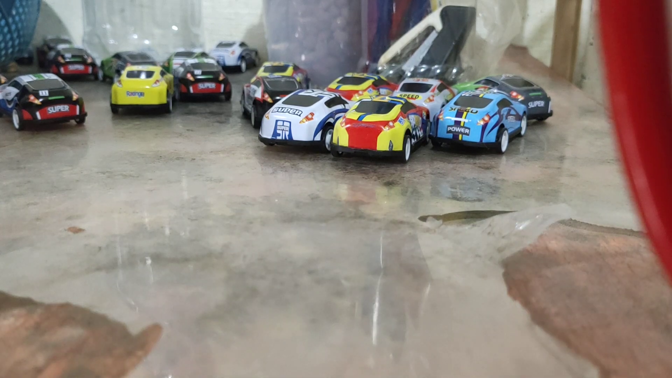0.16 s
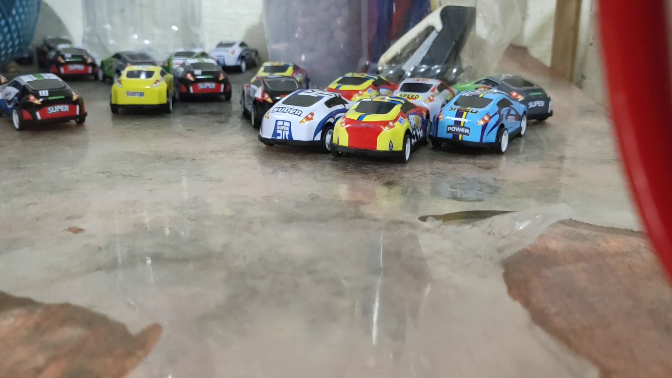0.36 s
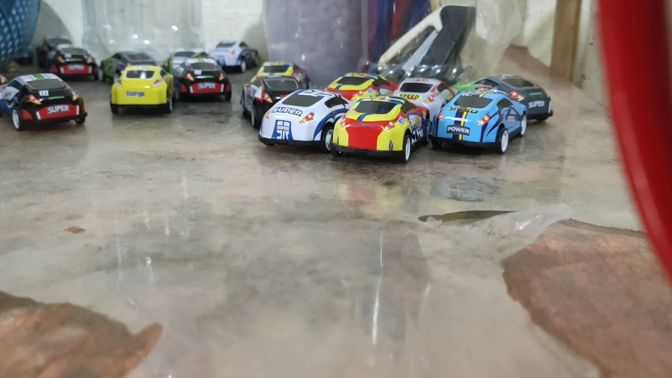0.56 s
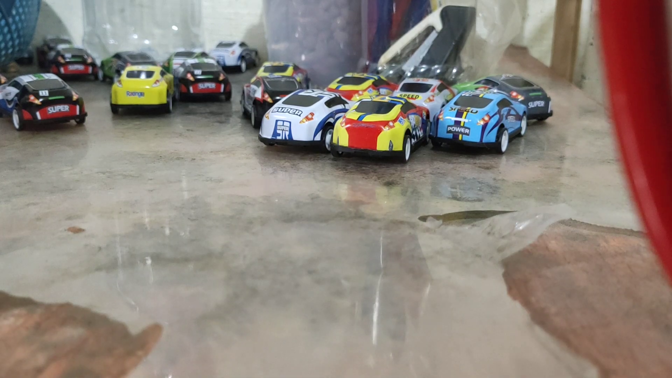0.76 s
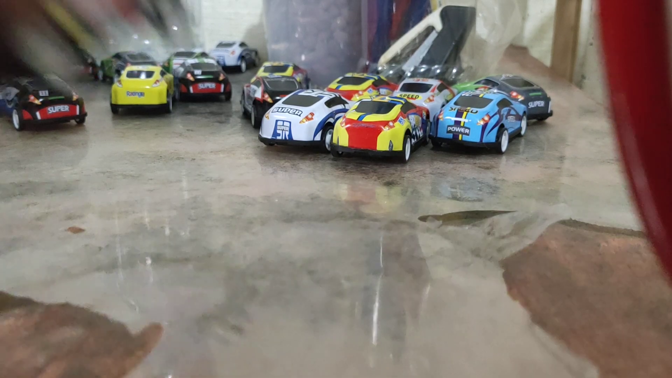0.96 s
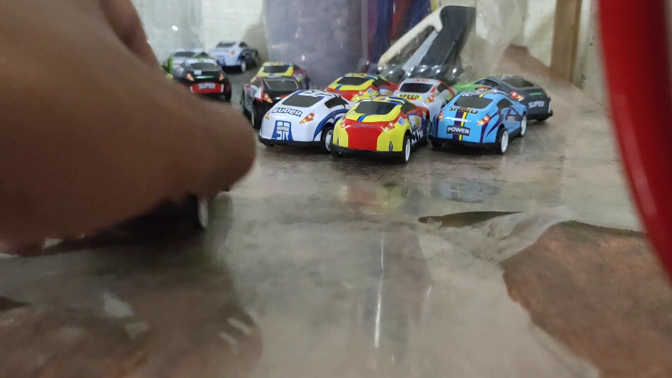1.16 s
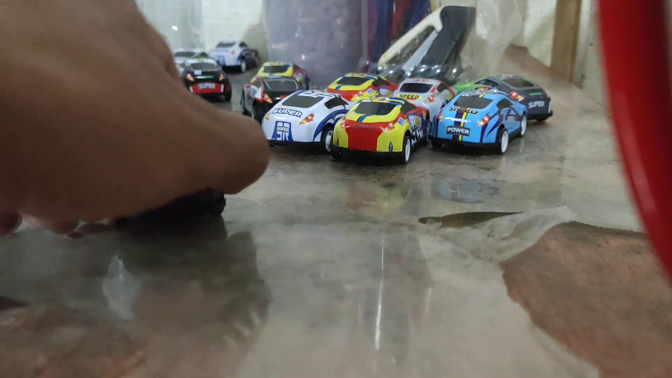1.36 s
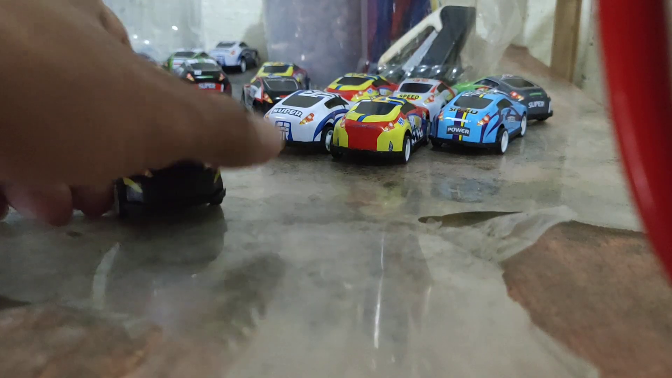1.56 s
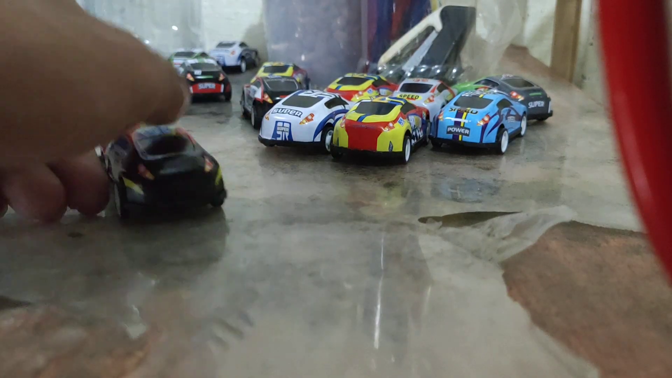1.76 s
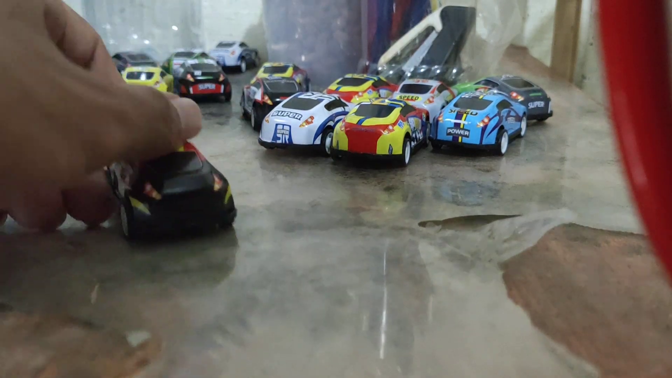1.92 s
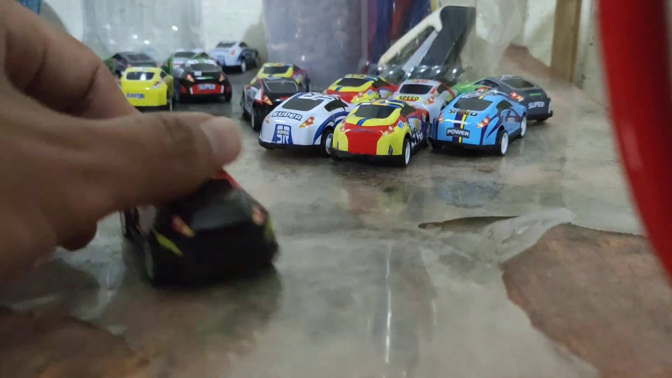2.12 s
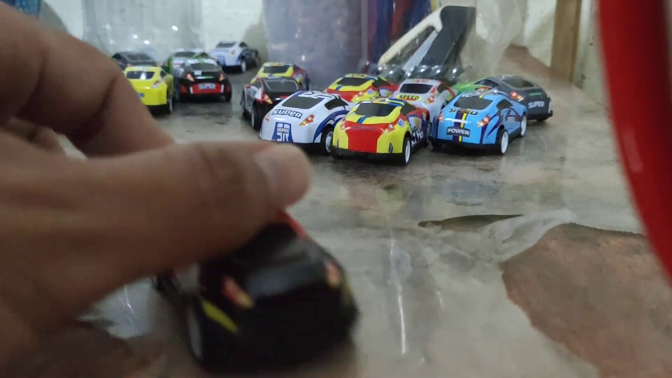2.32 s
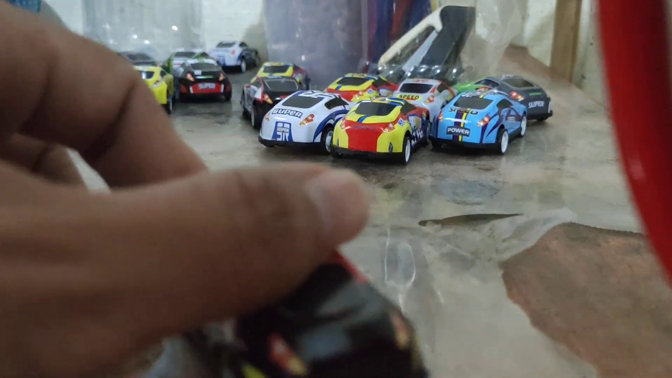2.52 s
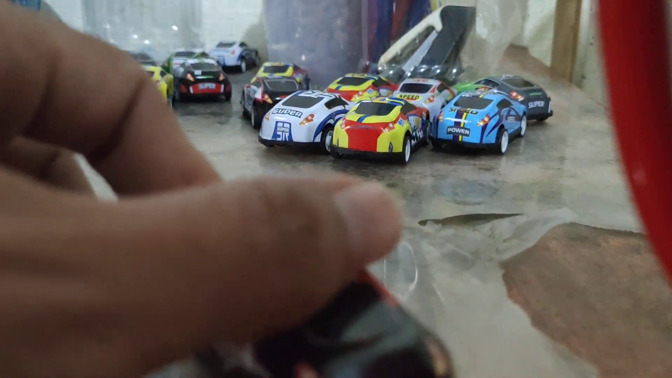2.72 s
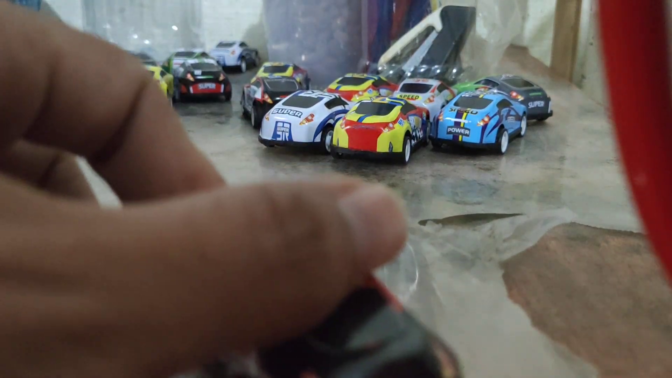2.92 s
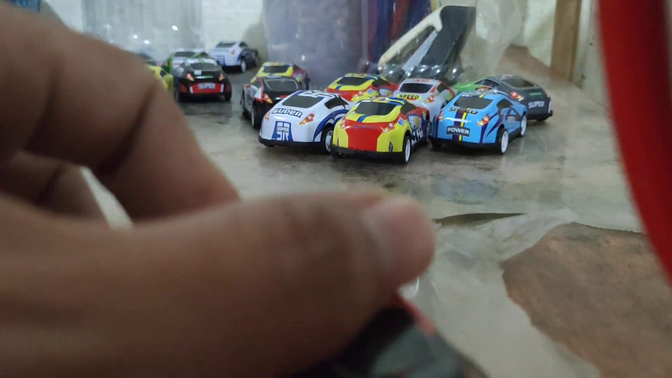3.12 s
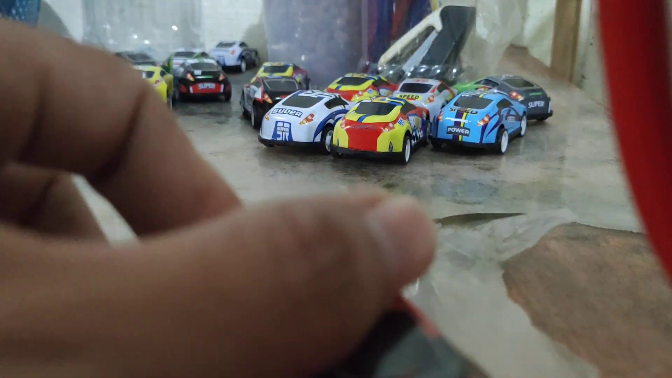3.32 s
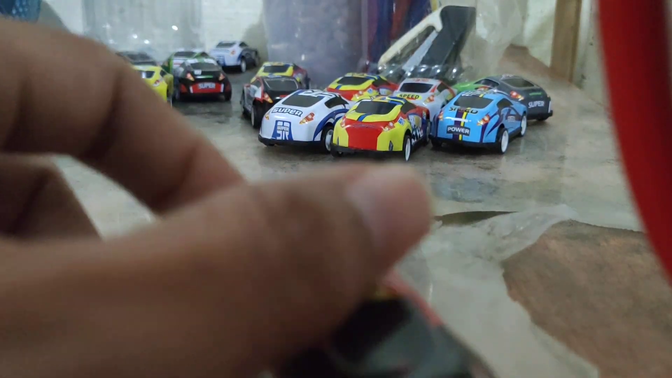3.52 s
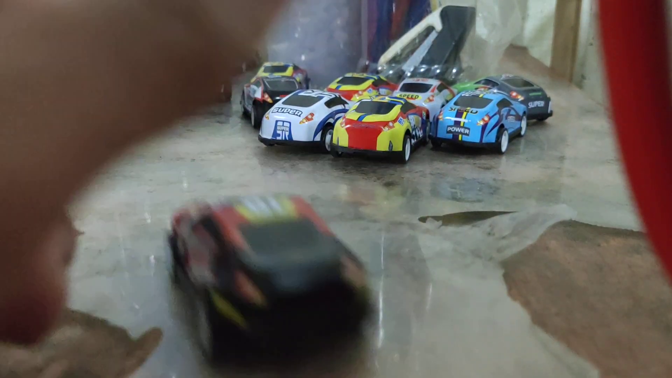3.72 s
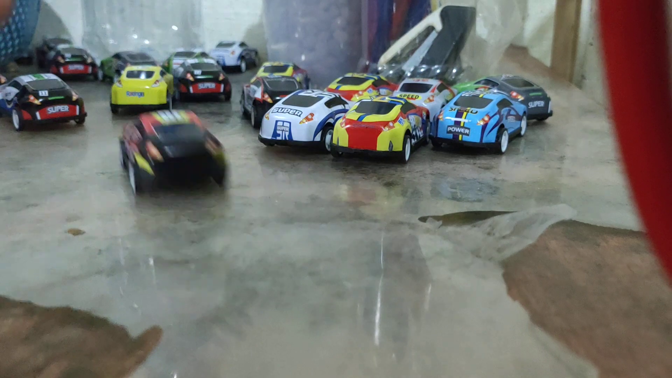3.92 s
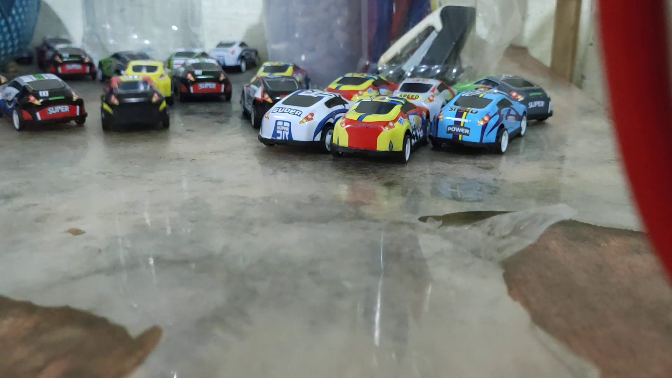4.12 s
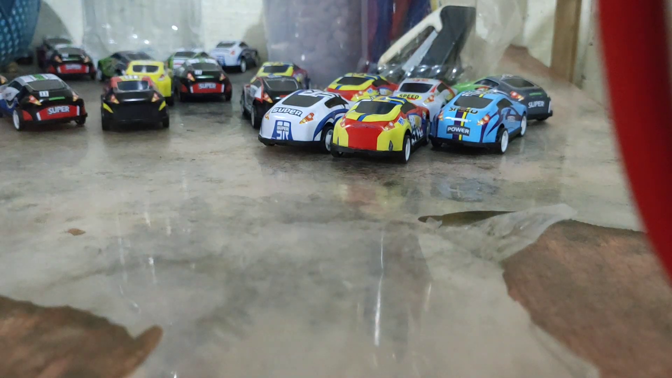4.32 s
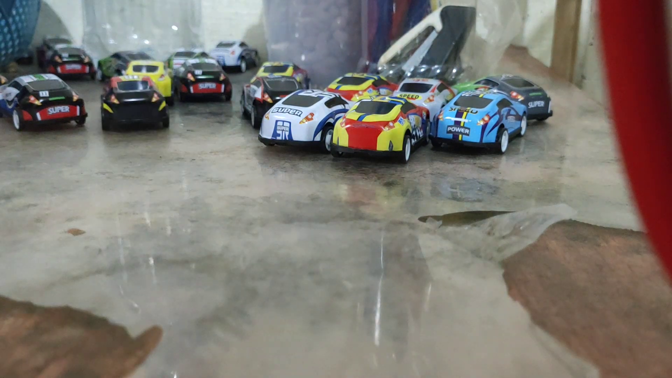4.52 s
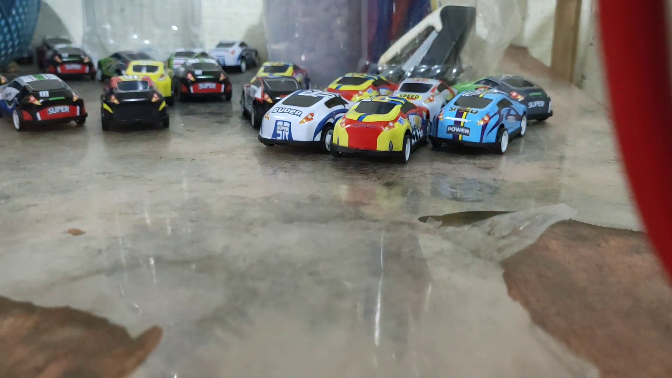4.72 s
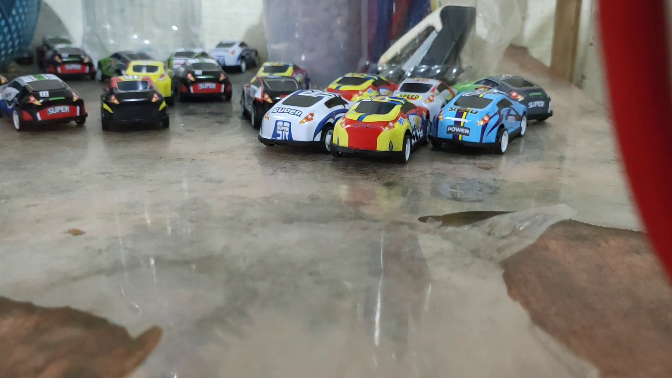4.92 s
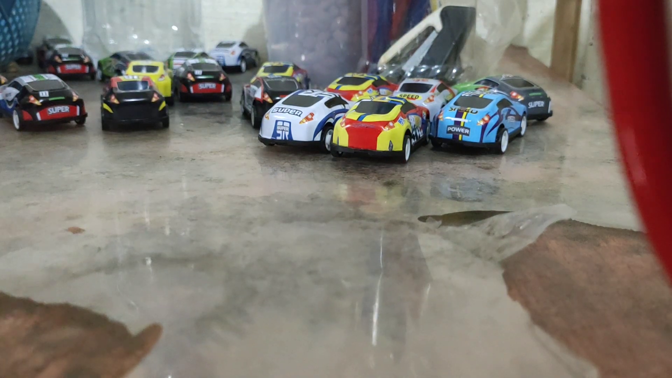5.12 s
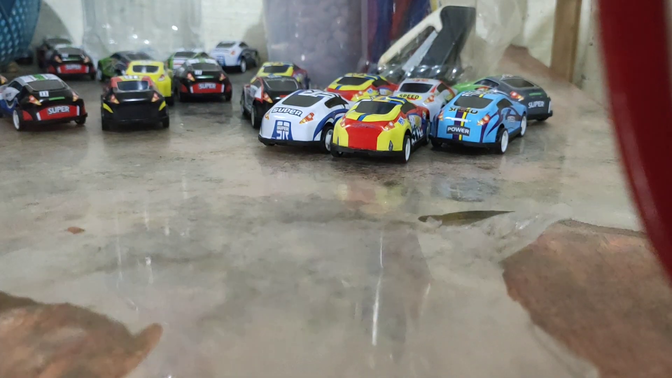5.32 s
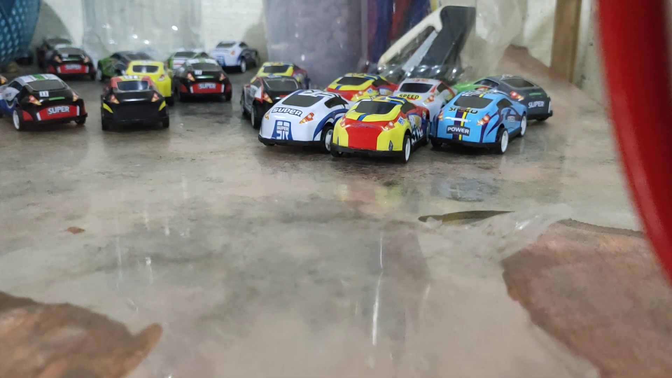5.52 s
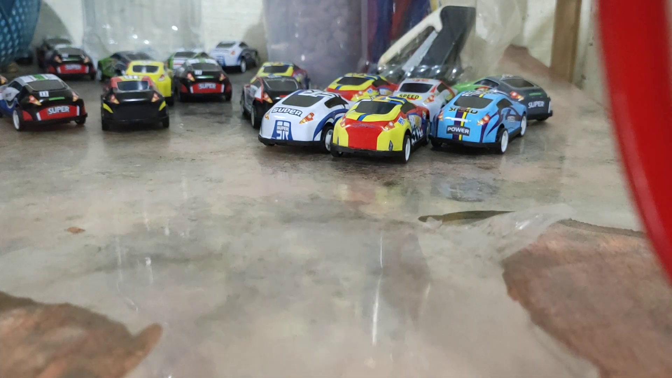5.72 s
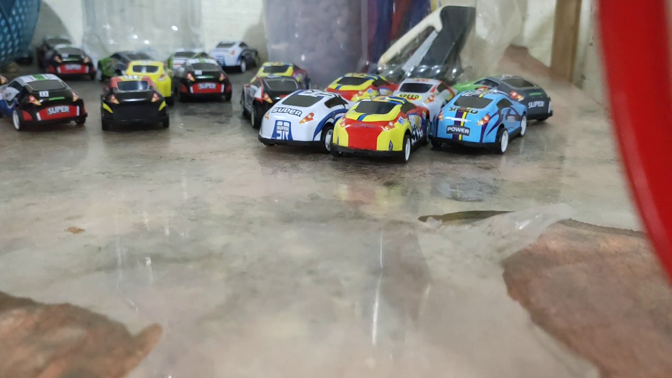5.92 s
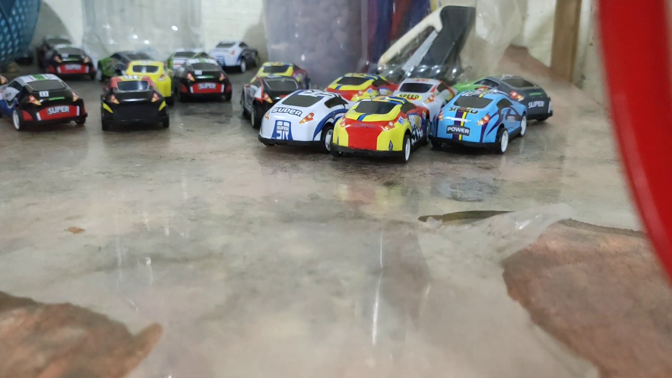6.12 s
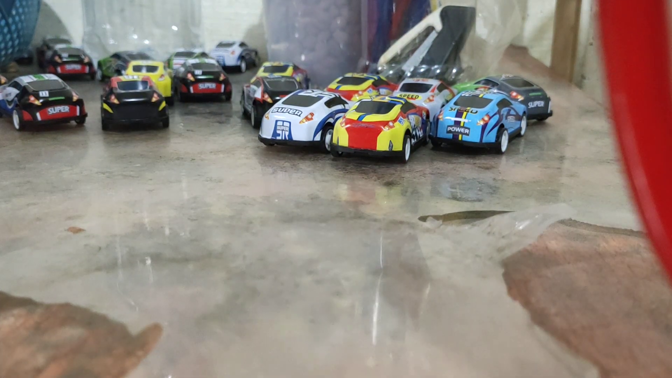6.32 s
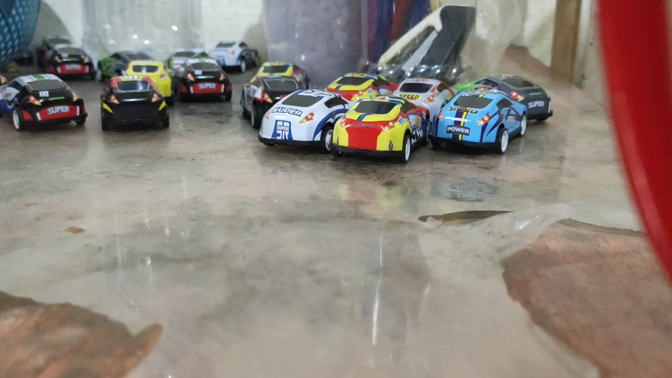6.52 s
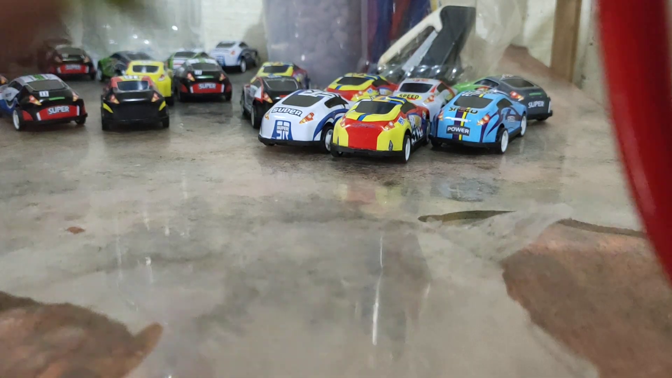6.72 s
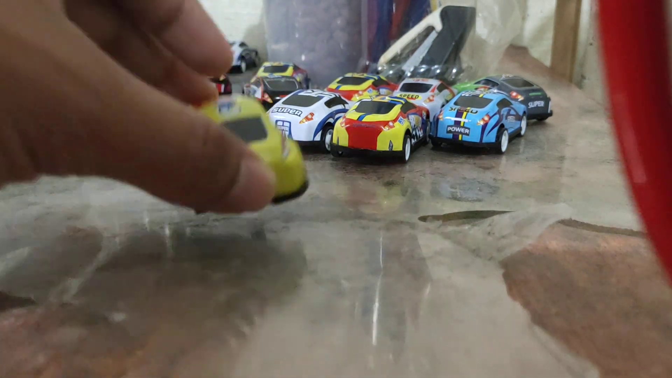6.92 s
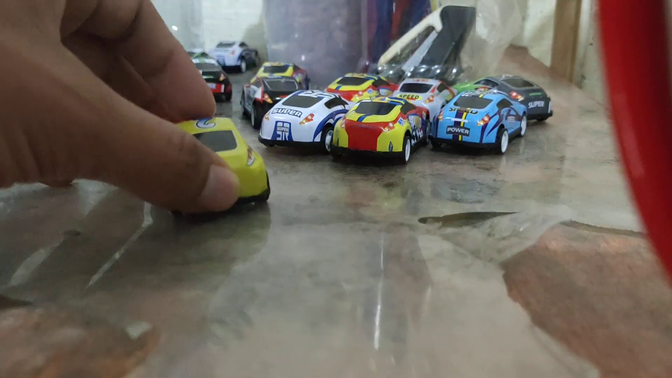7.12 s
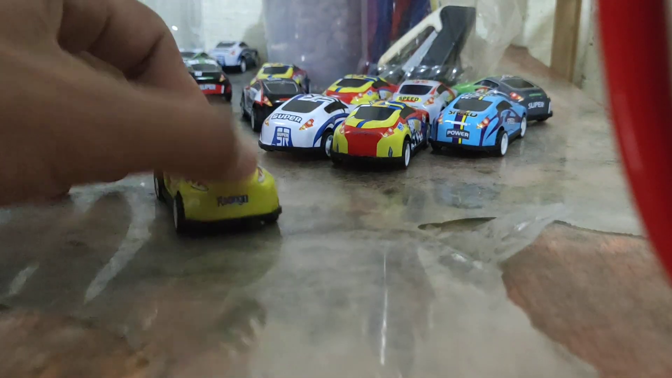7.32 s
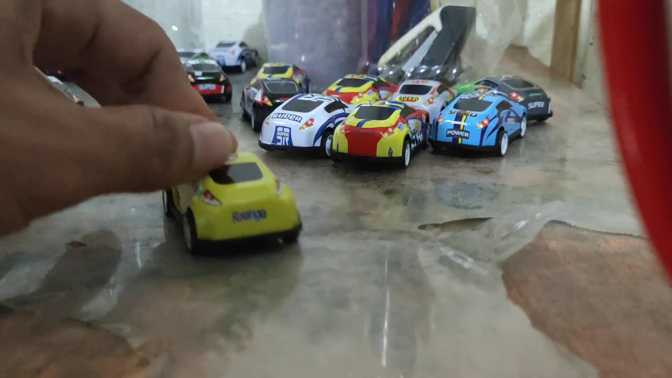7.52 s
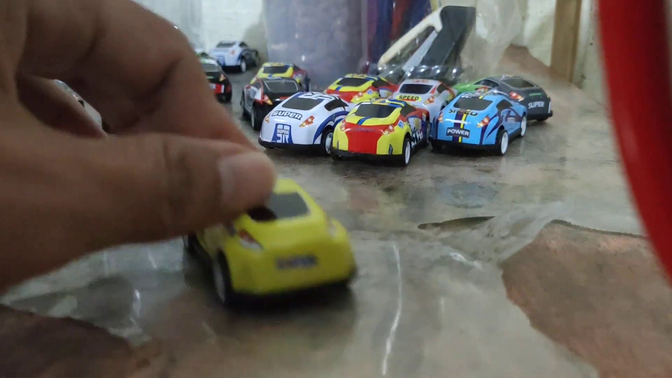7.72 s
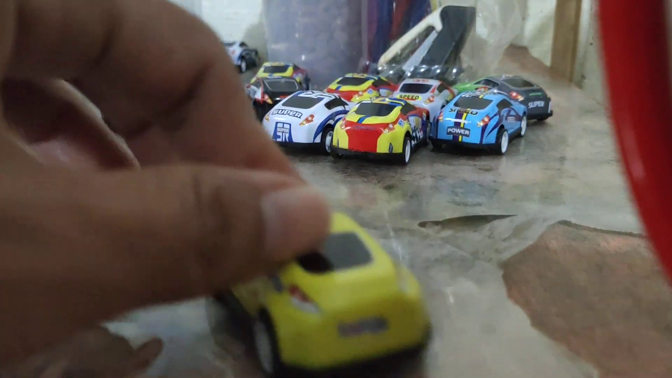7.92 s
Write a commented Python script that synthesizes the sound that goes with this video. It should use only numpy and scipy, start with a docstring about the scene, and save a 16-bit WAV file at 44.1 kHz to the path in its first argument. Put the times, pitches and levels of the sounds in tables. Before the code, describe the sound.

Close to the microphone in a hard, humming room, a hand brushes small toy cars and sets one down with a knock. It is drawn back with scratchy ratchet ticks, then let go; it whirrs off and smacks into parked cars with a short rattle. A hard clack sounds further off to the right, and later a second car is wound back.

```python
"""Pull-back toy cars on a stone floor

Small toy cars are played with in a hard, humming room, under brushes of hand and sleeve.
A car is drawn back, its motor ticking and scraping, then whirrs off and bumps into the parked cars.
Something hard clacks further off to the right, then a second car is drawn back.
Ticks, knocks and clacks are short noise bursts through resonances; scrape and whirr are
streams of tiny bursts; the hum is unsteady sines over coloured noise."""
import sys
import numpy as np
from scipy import signal
from scipy.fft import rfft, irfft
from scipy.io import wavfile
from scipy.ndimage import uniform_filter1d

SR = 44100
rng = np.random.default_rng(int(sys.argv[2]) if len(sys.argv) > 2 else 0)


def store_wav(level_fs):
    """Save 16-bit WAV to argv[1]."""
    pcm = np.round(np.clip(np.atleast_2d(level_fs), -1, 1) * 32767)
    wavfile.write(sys.argv[1], SR, pcm.T.astype(np.int16))


N = 351036
TIME = np.arange(N) / SR

# Room tone: colour of the air noise (frequency [Hz], relative level [dB])
AIR_COLOUR = [(8, -29), (22, -2), (38, -26.5), (55, -1.5), (78, -10.5), (110, -3), (150, -16.5), (280, -15),
              (420, -19.5), (650, -18.5), (1000, -22.5), (2400, -25.5), (3500, -29.5), (9400, -37),
              (16000, -47)]
# Left-right likeness of the air noise (frequency [Hz], correlation [-1 to 1])
AIR_LIKENESS = [(60, 1), (290, 0.82), (640, 0.19), (1410, -0.22), (3100, -0.066)]
# Faint steady tones (frequency [Hz], level [dB])
WHINE_TONES = [(159, -67), (227, -72), (390, -74), (1303, -75.5), (2207, -75.5)]
# Brief fades of the hum (centre time [s], length [s], depth [dB])
HUM_DIPS = [(2.982, 0.34, 12.5), (4.83, 0.15, 21), (6.45, 0.23, 6), (7.25, 0.16, 12)]
# Swells of the higher drone (centre time [s], length [s], level [dB])
DRONE_SWELLS = [(.55, 0.46, -49.5), (2.336, 0.86, -60), (4.361, 0.34, -54), (7.882, 0.62, -53)]

# Hand and sleeve over the cars (centre time [s], length [s], relative level [dB], treble corner [Hz])
BRUSHES = [(.1, 0.56, -63, 3000), (0.45, 0.23, -48.5, 3380), (1.295, 0.12, -53.5, 9050),
           (1.453, 0.085, -49, 9000), (1.878, 0.065, -52.5, 9050)]
# Soft high swishes (centre time [s], length [s], relative level [dB], left-right balance [dB])
SWISHES = [(4.788, 0.12, -56, -2), (5.1, 0.07, -44, 13), (5.591, 0.051, -55, -4), (5.72, 0.052, -55, -2)]
# Colours of brush and swish (frequency [Hz], relative level [dB])
BRUSH_COLOUR = [(300, -1), (1500, -9.5), (2500, -5), (4000, -10.5), (9500, -2.5), (11200, -10.5)]
SWISH_COLOUR = [(1000, -35), (5000, 3.5), (7000, -1), (9500, 7), (12000, -2), (14000, 5.5), (16000, -3)]

# Car bodies knocking on each other and the floor
# (time [s], relative level [dB], treble tilt [dB per octave])
KNOCKS = [(.802, -35, -7.5), (.825, -33, -12), (1.2196, -23.5, -6), (1.439, -39, -0.5), (3.73, -39, 1.5),
          (3.773, -29.5, -3.5), (3.836, -39, 5), (3.883, -33, 2.5), (3.99, -26.5, -15),
          (4.1304, -16.5, -1.5), (4.1314, -9.5, -3), (4.152, -17, -8), (4.177, -17, -5),
          (4.228, -18.5, -6.5), (4.236, -22, -6.5), (6.001, -36.5, -4), (7.079, -29.5, -7),
          (7.213, -34.5, -0.5), (7.269, -30, -7.5), (7.742, -34, -21)]
# Dull thuds of the chassis on its wheels (time [s], relative level [dB])
THUDS = [(2.542, -38.5), (2.69, -40), (2.793, -41.5), (4.132, -44), (4.178, -35.5), (4.191, -37),
         (4.197, -38), (4.229, -37), (4.242, -38), (7.74, -43.5)]
# Colours of knock and thud (frequency [Hz], relative level [dB])
KNOCK_COLOUR = [(300, -7.5), (1200, -1), (1750, -0.5), (2350, 6), (2950, 3.5), (3600, -5), (6300, 5),
                (9000, 3), (12000, -2.5), (16000, -12)]
THUD_COLOUR = [(50, -30), (130, 5.5), (300, 3.5), (500, 3.5), (800, -7.5), (1500, -9), (3000, -13),
               (8000, -70)]

# Resonances of the first and second car (frequency [Hz], width [Hz], relative strength [dB])
FIRST_SHELL = [(2390, 320, 2.5), (2870, 110, 4.5), (4330, 400, 5), (4920, 180, 6.5), (5900, 1000, 3),
               (6560, 600, 1), (9230, 1170, 5.5), (11900, 400, -0.5), (14200, 500, 5)]
SECOND_SHELL = [(2680, 230, 2.5), (7400, 380, 2), (9230, 580, 4), (11000, 1100, 0), (13300, 1300, 4)]
# Hardest catches of ratchet and wheels (time [s], relative level [dB], treble tilt [dB per octave])
TICKS = [(2.058, -25, -6), (2.092, -24.5, 5.5), (2.125, -24, 3), (2.146, -26, 2), (2.184, -23, 1),
         (2.198, -16.5, 5.5), (2.21, -22, 2), (2.215, -17.5, 3), (2.229, -21, 4), (2.234, -23, 9),
         (2.257, -19.5, 3), (2.262, -23, 2), (2.273, -17, 0), (2.333, -19, 5), (2.364, -19.5, 9),
         (2.378, -19, 8), (2.4022, -18, 11.5), (2.409, -22, 3), (2.443, -20, 11.5), (2.45, -28, 5),
         (2.468, -16.5, 14), (2.511, -24, -1), (2.518, -21, 0), (2.532, -22.5, 3), (2.543, -16, -21),
         (2.563, -21.5, 4), (2.597, -24.5, 6), (2.62, -23, -11), (2.671, -25.5, -8), (2.6904, -17, -5),
         (2.6984, -18.5, 9), (2.7338, -23.5, 2), (2.7918, -15.5, -7), (2.804, -18.5, -2),
         (3.1057, -24.5, 0), (3.1216, -24.5, 5.5), (3.157, -30.5, 4), (3.185, -25.5, -7), (3.198, -25.5, 9),
         (3.55, -29, -22), (3.578, -13, -8), (7.385, -25, -7), (7.4404, -28, -3), (7.499, -26.5, 2),
         (7.532, -30, -14), (7.571, -28, 4), (7.581, -23, 1.5), (7.605, -29, -4), (7.6464, -11.5, 16.5),
         (7.6822, -16.5, 4), (7.691, -20, -3), (7.714, -22.5, 1), (7.7895, -19, 0), (7.8222, -19.5, -3),
         (7.86, -21, 1), (7.8681, -17, 10.5), (7.8765, -11, 0.5), (7.918, -16, 4.5), (7.9421, -18.5, -0.5)]
# The hand's tugs on a car
# (start [s], speeding up [s], steady [s], slowing [s], speed [relative])
DRAWS = [(1.999, 0.14, 0.17, 0.042, 1.06), (2.335, 0.05, 0.18, 0.076, 0.7),
         (2.491, 0.018, 0.02, 0.023, 0.76), (2.788, 0.007, 0.021, 0.048, 0.76),
         (3.069, 0.032, 0.13, 0.054, 0.28), (7.361, 0.38, 0.061, 0.021, 1.16),
         (7.82, 0.04, 0.056, .06, 1.43)]
# Path of the drawn car across the stereo image (time [s], left-right balance [dB])
CAR_PATH = [(2.0, 5), (2.2, 3), (2.45, 8.5), (2.8, 2.5), (3.15, 5), (3.58, 3.5), (7.4, -0.5), (7.65, 4.5),
            (7.95, 5)]
# Colours of tick, scrape and whirr (frequency [Hz], relative level [dB])
TICK_COLOUR = [(300, -16), (1500, -4), (2500, -9.5), (3500, -3.5), (5000, 0.5), (7000, 9.5), (9200, 6.5),
               (11000, 3.5), (13000, -3.5), (16000, -12)]
SCRAPE_COLOUR = [(300, 2), (1600, -10), (4000, -1), (7000, -1.5), (9500, -3.5), (13000, -21), (16000, -33)]
WHIRR_COLOUR = [(300, -7), (1100, -8), (1800, -3.5), (2300, 2), (3550, -9.5), (5200, -10.5), (6300, -0.5),
                (7600, -6.5), (9000, -4), (13000, -17.5)]

# Hard clacks further off
# (time [s], relative level [dB], 60 dB decay [s], treble tilt [dB per octave])
CLACKS = [(5.1047, -23.5, .024, 0), (5.1095, -17, .012, -4), (5.123, -31, .02, 11),
          (5.1375, -12.5, 0.026, 2.5), (5.159, -30, 0.015, -7)]
# Colour of the clack (frequency [Hz], relative level [dB])
CLACK_COLOUR = [(300, -17), (1300, -7), (2000, -8.5), (3400, -8.5), (5000, -0.5), (8000, -4), (10500, -2),
                (13000, -5), (16000, -16)]
# Resonances of the clacking object (frequency [Hz], width [Hz], relative strength [dB])
CLACK_MODES = [(2040, 250, 12), (2670, 174, 18.5), (3030, 160, 13), (3890, 190, 13), (4320, 200, 10),
               (4700, 230, 11), (5750, 250, 3), (6500, 570, 6.5), (8040, 250, 5), (10400, 700, 7.5),
               (11900, 400, 7.5), (14100, 400, 11)]

# Filters on the right channel for the drawn car and for the rolling and parked cars
# (frequency [Hz], gain [dB])
NEAR_SHADE = [(500, -1), (2500, 5.5), (5000, 1), (6800, -2.5), (8000, -12), (9300, -21), (11000, -20),
              (13000, -8), (16000, 10)]
FAR_SHADE = [(400, -9.5), (2300, -0.5), (4800, -0.5), (8500, -17.5), (13500, -3.5)]
# Reverberation of the room (frequency [Hz], 60 dB decay [s])
ROOM_T60 = [(2000, 0.39), (5000, 0.48), (15000, 0.24)]

AIR_DB = -53.5  # before mid and side add up
HUM_HZ, HUM_DB, HUM_WAVER_DB = 96.8, -52.5, 3.1
DRONE_HZ, DRONE_DB = 120.3, -67
# Left channel first for the cars; negative means right channel first, for the clack
CAR_LEAD_S, CLACK_LEAD_S = .00028, -.00041
SECOND_CAR_S = 6.5
# The ratchet at speed 1; tooth levels are relative
TEETH_PER_S, TOOTH_DB, TOOTH_SPREAD_DB = 45, -32, 3
TICK_T60_S, HALVING_TILT_DB = 0.015, 14.5  # this much upward tilt halves a tick's decay
REBOUND_S = .0008  # typical; each burst draws half to twice this
SCRAPE_DB, SCRAPE_LAW = -46, 0.75  # level at speed 1; power of the speed that sets the amplitude
RELEASE_S, SPIN_UP_S, CRASH_S = 3.605, 0.37, 4.13
RUN_DB, RATTLE_DB, RATTLE_HOLD_S, RATTLE_T60_S = -41, -32, 0.051, 0.27
CUTOFF_HZ = 16000


def from_db(db):
    """Decibels to amplitude gain."""
    return 10 ** (np.asarray(db) / 20)


def rms_one(x):
    """Scale to unit power."""
    return x / np.sqrt(np.mean(x ** 2) + 1e-20)


def at_hz(points, hz):
    """Read a table on a log-frequency axis."""
    table_hz, value = np.transpose(points)
    return np.interp(np.log(np.maximum(hz, 1)), np.log(table_hz), value)


def panned(pan_db):
    """Left and right gains of constant power; positive leans left."""
    gains = from_db(np.array([pan_db, -pan_db]) / 2)
    return gains / np.sqrt(np.mean(gains ** 2, axis=0))


def drift(rate):
    """Random wander of spread 1, with this many turning points per second."""
    knots = rng.standard_normal(int(N / SR * rate) + 2)
    return rms_one(np.interp(TIME * rate, np.arange(len(knots)), knots))


def swell(s, length_s):
    """A smooth bump of height 1 around s, half as high at the ends of its length."""
    return .5 ** ((2 * (TIME - s) / length_s) ** 2)


def ramp(s, length_s):
    """Rise from 0 to 1 over the given length, starting at s."""
    return np.clip((TIME - s) / max(length_s, .001), 0, 1)


def filtered(x, gain):
    """Causal (minimum-phase) filter with the given gains from 0 Hz to half the sample rate."""
    cepstrum = irfft(np.log(gain + 1e-9))
    half = len(cepstrum) // 2
    # folding the cepstrum forward in time gives minimum phase
    cepstrum[1:half] *= 2
    cepstrum[half + 1:] = 0
    response = irfft(np.exp(rfft(cepstrum)))[None, :half]
    return signal.oaconvolve(x, response)[:, :N]


def body(x, colour, modes=(), size=2048):
    """A broad colour with resonances standing out of it; keeps the power of white input."""
    hz = np.linspace(0, SR / 2, size + 1)
    peaks = 0
    for mode_hz, width_hz, db in modes:
        peaks = peaks + 2 * from_db(db) ** 2 / (1 + (2 * (hz - mode_hz) / width_hz) ** 2)
    return filtered(x, rms_one(from_db(at_hz(colour, hz)) * np.sqrt(1 + peaks)))


def contacts(rows, rise_s, spot_db, crack=0, rebound=0, knee_hz=SR / 8, size=3072, count=64, order=24):
    """Each row (time, dB, t60, tilt above the knee) is a burst of crowded, quickly dying vibration."""
    out = np.zeros((2, N + 2 * size))
    t = np.arange(size) / SR
    hz = np.linspace(0, SR / 2, size // 4 + 1)
    octaves = np.log2(np.clip(hz, knee_hz, 13000) / knee_hz)
    for s, db, t60, tilt_db in rows:
        t60 = max(t60, .002)
        envelope = (1 - np.exp(-t / rise_s)) * from_db(-60 * t / t60)
        envelope /= envelope.max()
        # a sharp blow feeds all frequencies evenly
        spectrum = rfft(rng.standard_normal((2, size)) * envelope)
        burst = irfft(spectrum / uniform_filter1d(np.abs(spectrum), order)) * (t < t60)
        # a hard contact opens with one sharp crack
        burst[:, envelope.argmax()] += crack * np.linalg.norm(burst, axis=1)
        # a light part rebounds at once and touches again
        lag = int(REBOUND_S * rng.uniform(.5, 2) * SR)
        burst = burst + rebound * np.pad(burst, ((0, 0), (lag, 0)))[:, :size]
        burst *= np.linalg.norm(envelope) / np.linalg.norm(burst, axis=1, keepdims=True)
        # every touch lands on another spot and favours other modes
        spot_levels = rng.normal(0, spot_db, count)
        spot = rms_one(from_db(np.interp(hz, np.linspace(0, SR / 2, count), spot_levels)))
        # the tilt brightens a hard touch and dulls a soft one
        burst = filtered(burst, spot * from_db(tilt_db * octaves))
        start = int(s * SR)
        out[:, start:start + burst.shape[1]] += from_db(db) * burst
    return out[:, :N]


def chatter(per_s, spread_db, grain_s, smooth):
    """Gear teeth and grit: uneven tiny bursts over an even hiss; unit power."""
    born = rng.random(N) < per_s / SR
    power = born * from_db(spread_db * np.clip(rng.standard_normal(N), -2, 2)) ** 2
    # each burst dies away exponentially
    power = signal.lfilter([1], [1, -np.exp(-1 / (grain_s * SR))], power + 1e-18)
    return rms_one(np.sqrt(power / power.mean() + smooth) * rng.standard_normal((2, N)))


def at_ears(x, lead_s, alike):
    """Part of the left channel reaches the right a moment later (earlier if negative)."""
    share = np.clip(alike, 0, .95)
    delayed = np.roll(x[0], int(round(lead_s * SR)))
    return np.array([x[0], share * delayed + np.sqrt(1 - share ** 2) * x[1]])


def moving_echo(x, delay_s, sway, strength):
    """A nearby surface returns the sound; the wandering delay sweeps the comb notches."""
    lag = delay_s * np.exp(sway * drift(7))
    share = np.clip(strength, 0, .9)
    echo = np.array([np.interp(TIME - lag, TIME, ear) for ear in x])
    return (x + share * echo) / np.hypot(1, share)


def shaded(x, shade, size=512):
    """The right channel, facing away from the cars, hears them in another colour."""
    gain = from_db(at_hz(shade, np.linspace(0, SR / 2, size + 1)))
    return np.vstack([x[:1], filtered(x[1:], gain)])


def tone(hz, wander_hz):
    """A slightly unsteady sine of unit power."""
    return np.sqrt(2) * np.sin(2 * np.pi * np.cumsum(hz + wander_hz * drift(9)) / SR)


def hum():
    """A low tone that wavers and now and then fades, and a higher drone that swells."""
    dips_db = sum(depth_db * swell(s, length) for s, length, depth_db in HUM_DIPS)
    low = from_db(HUM_DB + HUM_WAVER_DB * drift(5.5) - dips_db)
    drone = from_db(DRONE_DB) + sum(from_db(db) * swell(s, length) for s, length, db in DRONE_SWELLS)
    return low * tone(HUM_HZ, wander_hz=1.893) + drone * tone(DRONE_HZ, wander_hz=4.9)


def background(size=4096):
    """Hum and faint tones over air noise whose left-right likeness changes with frequency."""
    alike = np.clip(at_hz(AIR_LIKENESS, np.linspace(0, SR / 2, size + 1)), -.99, .99)
    mid = filtered(rng.standard_normal((1, N)), np.sqrt(1 + alike))
    side = filtered(rng.standard_normal((1, N)), np.sqrt(1 - alike))
    air = from_db(AIR_DB) * body(np.vstack([mid + side, mid - side]), AIR_COLOUR, size=4096)
    whine = sum(from_db(db) * tone(hz, wander_hz=4.034) for hz, db in WHINE_TONES)
    return air + hum() + whine


def rubbing(size=512):
    """Skin and cloth brush the cars as grainy noise; soft swishes are swelling smooth noise."""
    hz = np.linspace(0, SR / 2, size + 1)
    grain = chatter(per_s=300, spread_db=2.5, grain_s=0.0016, smooth=0.54)
    grain = body(grain, BRUSH_COLOUR) * panned(4.5)[:, None]
    brush = 0
    for s, length, db, corner_hz in BRUSHES:
        stroke = filtered(grain, 1 / np.sqrt(1 + (hz / corner_hz) ** 4))
        brush = brush + from_db(db) * swell(s, length) * stroke
    swish = 0
    for s, length, db, pan_db in SWISHES:
        swish = swish + from_db(db) * swell(s, length) * panned(pan_db)[:, None]
    return brush + body(swish * rng.standard_normal((2, N)), SWISH_COLOUR)


def knocking_cars():
    """Shells knock brightly and briefly; the chassis thuds beneath, lower and longer."""
    knock_rows = [(s, db, .009, tilt) for s, db, tilt in KNOCKS]
    knocks = contacts(knock_rows, rise_s=0.0006, spot_db=3.0, crack=.4, knee_hz=2800)
    knocks = body(at_ears(knocks, CAR_LEAD_S, alike=0.5), KNOCK_COLOUR, FIRST_SHELL)
    thud_rows = [(s, db, .055, 0) for s, db in THUDS]
    thuds = contacts(thud_rows, rise_s=0.00086, spot_db=3.0)[:1]  # the same in both channels
    return knocks + body(thuds, THUD_COLOUR)


def draw_speed():
    """Each tug of the hand speeds up, holds and slows down."""
    total = 0
    for s, up, steady, down, speed in DRAWS:
        total = total + speed * ramp(s, up) * (1 - ramp(s + up + steady, down))
    return total


def ratchet(speed, count=80):
    """A light tick for each uneven tooth that the wheels turn past: rows (time, dB, tilt)."""
    turned = np.cumsum(speed) * TEETH_PER_S / SR
    chance = rng.standard_normal((count, 2))
    teeth = np.cumsum(np.exp(0.42 * chance[:, 0]))
    times = np.searchsorted(turned, teeth) / SR  # teeth never reached fall past the end
    return [(s, TOOTH_DB + TOOTH_SPREAD_DB * luck, 0) for s, luck in zip(times, chance[:, 1])]


def drawn_car():
    """Close by, the spring motor ticks while wheels and gears scrape; each car has its own ring."""
    speed = draw_speed()
    catches = []
    for s, db, tilt in TICKS + ratchet(speed):
        # a harder catch is brighter and shorter
        t60 = TICK_T60_S * .5 ** (max(tilt, 0) / HALVING_TILT_DB)
        catches.append((s, db, t60, tilt))
    ticks = contacts(catches, rise_s=0.0001, spot_db=3.5, crack=0.6, rebound=0.44, knee_hz=7200)
    scrape = from_db(SCRAPE_DB) * speed ** SCRAPE_LAW
    scrape = scrape * chatter(per_s=450, spread_db=6.5, grain_s=0.0022, smooth=0.027)

    def through(shell):
        """Ticks and scrape ring in one car's shell."""
        return from_db(-8.0) * body(ticks, TICK_COLOUR, shell) + body(scrape, SCRAPE_COLOUR, shell)

    car = np.where(TIME < SECOND_CAR_S, through(FIRST_SHELL), through(SECOND_SHELL))
    car = at_ears(car, CAR_LEAD_S, alike=0.21)
    car = moving_echo(car, delay_s=.0009, sway=.15, strength=.5)
    return car * panned(np.interp(TIME, *np.transpose(CAR_PATH)))


def running_car():
    """The freed spring spins the gears to a rough whirr; after the crash loose parts rattle and settle."""
    rolling = from_db(RUN_DB + 1.4 * drift(70)) * ramp(RELEASE_S, SPIN_UP_S) * (TIME < CRASH_S)
    fading_s = np.maximum(TIME - CRASH_S - RATTLE_HOLD_S, 0)
    settling = from_db(RATTLE_DB - 60 * fading_s / RATTLE_T60_S) * (TIME >= CRASH_S)
    teeth = rolling * chatter(per_s=380, spread_db=4.0, grain_s=0.00092, smooth=0.15)
    rattle = settling * chatter(per_s=330, spread_db=3.0, grain_s=0.0027, smooth=0.15)
    whirr = body(teeth + rattle, WHIRR_COLOUR, FIRST_SHELL)
    # the floor answers first, the row of parked cars a little later
    whirr = moving_echo(whirr, delay_s=0.001263, sway=0.082, strength=0.95)
    whirr = moving_echo(whirr, delay_s=.003, sway=.06, strength=.6)
    return at_ears(whirr, CAR_LEAD_S, alike=0.63)


def clack():
    """A hard little object touches down, snaps flat and bounces, ringing in its own modes."""
    touches = contacts(CLACKS, rise_s=0.0001, spot_db=0.5, crack=0.46)
    touches = at_ears(touches, CLACK_LEAD_S, alike=0.45)
    return from_db(-3.5) * body(touches, CLACK_COLOUR, CLACK_MODES) * panned(-6.5)[:, None]


def room(x, build_s):
    """Diffuse echoes off hard walls: noise bands, each dying at its own rate, the top fastest."""
    t = np.arange(SR * 3 // 5) / SR
    edges = np.geomspace(100, 18000, 9)
    tail = 0
    for low, high in zip(edges, edges[1:]):
        band_pass = signal.butter(2, [low, high], "band", fs=SR, output="sos")
        band = signal.sosfilt(band_pass, rng.standard_normal((2, len(t))))
        tail = tail + band * from_db(-60 * t / at_hz(ROOM_T60, np.sqrt(low * high)))
    tail = tail * (1 - np.exp(-(t / build_s) ** 2))
    return signal.oaconvolve(x, tail / np.linalg.norm(tail, axis=1, keepdims=True))[:, :N]


def scene():
    """Mix the layers; the further off a source is, the more of the room it carries."""
    near, rolling, knocks, far = drawn_car(), running_car(), knocking_cars(), clack()
    send = from_db(-18.0) * near + from_db(-17.0) * rolling
    send = send + from_db(-9.0) * knocks + from_db(-2.0) * far
    echoes = room(send.sum(axis=0, keepdims=True) / np.sqrt(2), build_s=0.0013)
    cars = shaded(near, NEAR_SHADE) + shaded(rolling + knocks, FAR_SHADE)
    return cars + far + echoes + rubbing() + background()


def record(dry):
    """A steep low-pass cuts the top."""
    low_pass = signal.ellip(10, .2, 80, CUTOFF_HZ, fs=SR, output="sos")
    return signal.sosfilt(low_pass, dry)


dry = scene()
out = record(dry)
store_wav(out)
```